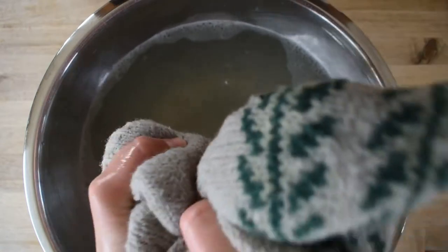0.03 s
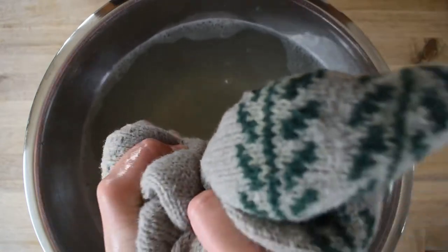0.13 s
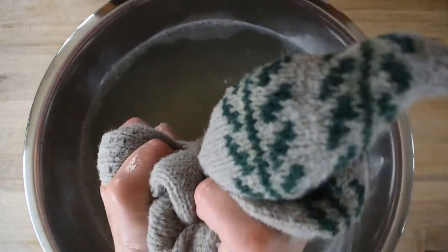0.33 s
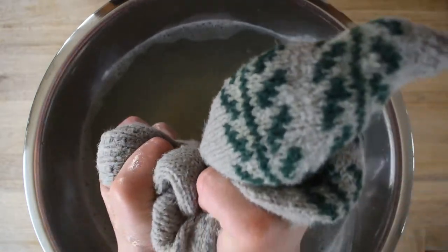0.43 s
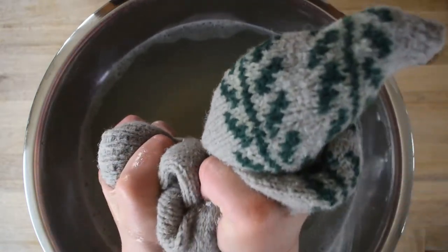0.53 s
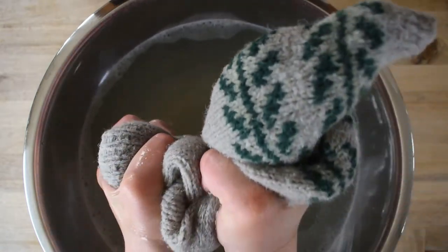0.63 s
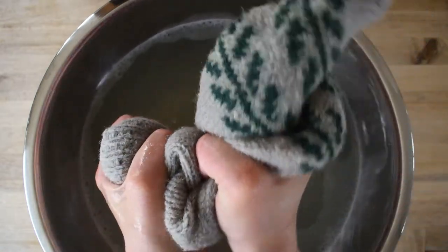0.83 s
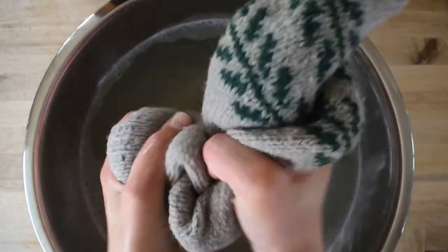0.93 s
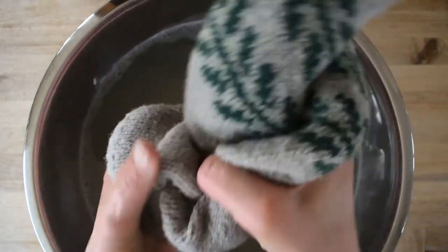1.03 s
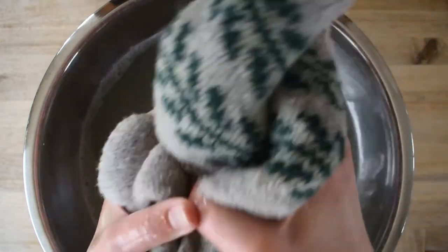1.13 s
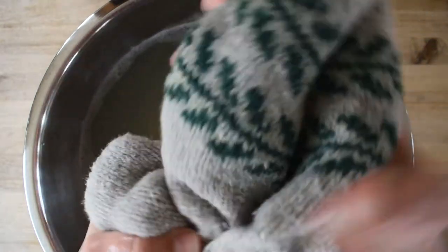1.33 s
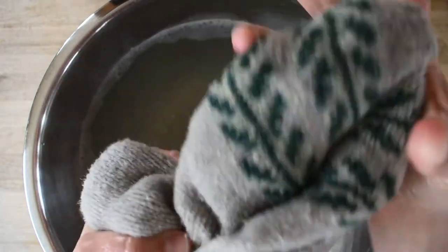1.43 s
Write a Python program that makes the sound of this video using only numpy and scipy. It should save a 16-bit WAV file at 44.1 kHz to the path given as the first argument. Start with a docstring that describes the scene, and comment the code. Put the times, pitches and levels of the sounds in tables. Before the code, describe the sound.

Water is wrung from wet wool into a metal basin, close by in a quiet room. Soft rubbing and fizzing lead to a short gurgle at about 0.2 seconds. From 0.3 to 1 second water trickles and drops plop, with tiny wet squeaks and faint ringing from the basin. A fine spray hisses near 0.85 seconds. After 1 second the water dies down, leaving faint clicks and soft knocks.

```python
"""Two hands wring a wet knitted garment over a metal basin of water, in a quiet room.
First the hands rub the cloth, foam fizzes softly and wet fibres tick. Near 0.2 s air gurgles out of
the wool and water trickles; then froth squeaks and drops plop, making the basin ring faintly.
Near 0.85 s, at the hardest squeeze, the fizz peaks and a fine spray hisses out. After 1 s the grip
relaxes and the water dies down, leaving a few last clicks and soft knocks."""
import sys
import numpy as np
from scipy import signal
from scipy.fft import rfft, irfft
from scipy.io import wavfile

SR = 44100
rng = np.random.default_rng(int(sys.argv[2]) if len(sys.argv) > 2 else 0)


def materialize(psi):
    """Save the field psi as 16-bit PCM at rate SR to the path in sys.argv[1].

    A 1-D psi becomes a single channel; in a 2-D psi each row is a channel.
    """
    bounded = np.clip(np.atleast_2d(psi).T, -1, 1)
    quanta = np.round(bounded * 32767).astype(np.int16)
    wavfile.write(sys.argv[1], SR, quanta)


N = 66150
TIME = np.arange(N) / SR


def amp(db):
    """Turn decibels into a number to multiply a sound by."""
    return 10 ** (np.asarray(db) / 20)


def unit(sound):
    """Scale a sound so that its average strength (rms) is 1."""
    return sound / np.sqrt(np.mean(sound ** 2) + 1e-20)


def level(points, t=TIME):
    """Join (time, dB) points with lines and give the gain at times t."""
    return amp(np.interp(t, *np.transpose(points)))


def colour(sound, points):
    """Set the balance of low and high tones from (Hz, dB) points; the result has strength 1."""
    hz, db = np.transpose(points)
    log_hz = np.log(np.fft.rfftfreq(N, 1 / SR) + 1)
    gain = amp(np.interp(log_hz, np.log(hz), db))
    return unit(irfft(rfft(sound) * gain, N))


def add(mix, start, sound):
    """Mix a sound in, start seconds from the beginning."""
    part = mix[max(round(start * SR), 0):][:len(sound)]
    part += sound[:len(part)]


def stereo(mid, side):
    """Make left and right from what they share (mid) and how they differ (side)."""
    return np.array([mid + side, mid - side])


def burst(envelope, hz, octaves, skirt_db):
    """Noise in a band around hz, plus a wider band (the skirt); the envelope sets its loudness."""
    octaves_away = np.log2((np.fft.rfftfreq(len(envelope), 1 / SR) + 1) / hz)
    band = np.exp(-.5 * (octaves_away / octaves) ** 2)
    skirt = amp(skirt_db) * np.exp(-.5 * octaves_away ** 2)
    noise = irfft((band + skirt) * np.exp(2j * np.pi * rng.random(len(band))))
    return unit(envelope * noise) * np.sqrt(np.mean(envelope ** 2))


def knocks(rows, octaves, skirt_db):
    """Each small hit is a burst of noise that rises quickly and dies away."""
    out, t = np.zeros(N), TIME[:4096]
    for start, db, hz, decay in rows:
        rise = 1 - np.exp(-t / (0.3 * decay))
        envelope = rise * np.exp(-t / decay)
        add(out, start, amp(db) * burst(envelope / envelope.max(), hz, octaves, skirt_db))
    return out


def bubble(hz, swell, ring, glide):
    """A bubble swells, rings and dies; its pitch slides as its size and depth change."""
    t = np.arange(0, 4 * ring + swell, 1 / SR)
    envelope = np.minimum(t / swell, 1) * np.exp(-(t / ring) ** 1.39)
    sliding_hz = hz * 2 ** (glide * t)
    return envelope / envelope.max() * np.sin(2 * np.pi * np.cumsum(sliding_hz) / SR)


# Tone of the room noise, mid and side: f/Hz, level/dB
ROOM_MID_COLOUR = [(15, -56), (25, -48.5), (113, -4.5), (178, -5.5), (389, -1.5), (509, -1), (582, -12.5),
                   (895, -2), (1050, -5), (1750, -4.5), (2490, -13.5), (9050, -38.5), (15500, -44)]
ROOM_SIDE_COLOUR = [(15, -44), (25, -13), (178, -4.5), (340, -4), (1050, -5), (1140, -3), (1380, -6),
                    (2560, -6), (9300, -23), (15500, -42)]

def room_noise():
    """The quiet room gives a steady hush and a faint hum of mains electricity."""
    mid = amp(-63) * colour(rng.standard_normal(N), ROOM_MID_COLOUR)
    side = amp(-63.5) * colour(rng.standard_normal(N), ROOM_SIDE_COLOUR)
    hum = amp(-80) * np.sqrt(2) * np.sin(2 * np.pi * 120.1 * TIME)
    return stereo(mid + hum, side)


# Loudness of the dull rubbing: t/s, level/dB
RUB_LOUDNESS = [(0, -65), (.2, -61.5), (.45, -62), (.75, -60.5), (.95, -60.5), (1.1, -63.5), (1.29, -65.5),
                (1.312, -60.5), (1.335, -63), (1.4, -64.5), (1.5, -59)]
# Its tone: f/Hz, level/dB
RUB_TONE = [(30, -18), (80, -13.5), (140, -4.5), (400, 0), (700, -1.5), (1500, -27.5), (6000, -42)]
# Soft knocks of hands and cloth: t/s, level/dB, f/Hz, decay/s
HAND_KNOCKS = [(.461, -59.5, 191, .012), (.665, -61, 171, 0.01), (1.306, -60, 250, 0.0077),
               (1.412, -60.5, 256, 0.022), (1.484, -61, 201, 0.01)]

def hands(width=0.36):
    """Hands rub and knock against the heavy wet cloth."""
    mid, side = (level(RUB_LOUDNESS) * colour(rng.standard_normal(N), RUB_TONE) for _ in range(2))
    return stereo(mid + knocks(HAND_KNOCKS, octaves=0.91, skirt_db=-30), width * side)


# Loudness of the foam in the wool: t/s, level/dB
FOAM_LOUDNESS = [(0, -70.5), (.1, -65.5), (.2, -60), (.33, -55.5), (.4, -58), (.46, -59), (.52, -62.5),
                 (.6, -54.5), (.66, -61), (.75, -63), (.8, -55), (.85, -50.5), (.9, -55), (.96, -56.5),
                 (1.02, -61.5), (1.15, -68), (1.27, -64), (1.5, -66)]
# Its tone: f/Hz, level/dB
FOAM_TONE = [(300, -42), (900, 2.5), (2500, 4.5), (4000, 5.5), (6000, -1), (8500, -4.5), (12000, -11.5),
             (16000, -18)]

def fizz(pops_per_s=2500, scatter_db=4):
    """Foam bursts in countless tiny clicks as the grip tightens."""
    pops = (rng.random(N) < pops_per_s / SR) * rng.choice([-1, 1], N)
    sizes = amp(scatter_db * np.minimum(rng.exponential(1, N), 5))
    hiss = 1.25 * rng.standard_normal(N)
    return colour(unit(pops * sizes) + hiss, FOAM_TONE) * level(FOAM_LOUDNESS)


# Loudness of the ticking fibres: t/s, level/dB
FIBRE_LOUDNESS = [(0, -70), (.1, -75), (.3, -65), (.43, -60.5), (.52, -64), (.65, -60.5), (.8, -58),
                  (.95, -63.5), (1.1, -71.5), (1.25, -67.5), (1.5, -79.5)]
# Their tone: f/Hz, level/dB
FIBRE_TONE = [(500, -23), (2000, 7), (5000, -4.5), (9000, -2), (12000, -9), (16000, -14)]

def crackle(ticks_per_s=170, scatter_db=3, decay_s=0.00056):
    """Wet fibres pull apart with separate tiny ticks."""
    ticks = rng.random(N) < ticks_per_s / SR
    sizes = amp(scatter_db * np.clip(rng.standard_normal(N), -2, 2))
    envelope = signal.lfilter([1], [1, -np.exp(-1 / (decay_s * SR))], ticks * sizes)  # each tick fades
    return colour(envelope * rng.standard_normal(N), FIBRE_TONE) * level(FIBRE_LOUDNESS)


# Wet slaps and clicks, before their tone is shaped: t/s, level/dB, f/Hz, decay/s
WET_SLAPS = [(0.071, -53, 8000, 0.0012), (.091, -49, 2600, 0.0019), (.1105, -53.5, 8000, 0.0014),
             (.2545, -58, 8000, 0.0024), (.270, -43, 2200, 0.0061), (.2863, -40.5, 3500, 0.00069),
             (0.307, -68, 7000, .003), (0.3546, -45.5, 9800, .003), (.414, -39.5, 7000, 0.00066),
             (0.43, -39.5, 6200, 0.0018), (0.4328, -43, 3750, 0.0017), (.4545, -41, 5640, 0.00041),
             (0.4573, -34.5, 3700, 0.001), (.4818, -43.5, 4530, .001), (.529, -43, 7100, .001),
             (0.5554, -36, 3770, 0.00057), (.560, -37.5, 4730, 0.0014), (.6150, -31.5, 7000, 0.00058),
             (.620, -38, 4030, 0.00044), (0.629, -38.5, 2600, 0.0013), (0.6359, -32, 3080, 0.0007),
             (0.6617, -39, 3700, 0.003), (0.7292, -35, 2260, 0.00056), (0.7384, -41, 2010, 0.0019),
             (.745, -38.5, 2200, 0.00066), (.771, -38, 2750, 0.0015), (.7953, -38.5, 9800, .001),
             (0.8005, -38.5, 4470, 0.0013), (0.807, -41, 5500, 0.0015), (.840, -47, 3980, 0.0016),
             (0.8985, -41, 3200, 0.00082), (.926, -34, 3780, 0.001), (.977, -46, 2520, 0.00061),
             (1.2592, -44, 6940, 0.0014), (1.286, -53, 7600, 0.0011)]
# Their tone: f/Hz, level/dB
SLAP_TONE = [(500, 11.5), (4000, 1.5), (9000, -1.5), (12000, -7.5), (16000, -9)]

def splats():
    """Drops land and thin films of water snap, each with a short burst of noise."""
    slaps = knocks(WET_SLAPS, octaves=0.3, skirt_db=2)
    return colour(slaps, SLAP_TONE) * np.std(slaps)


# Loudness of the air puffs: t/s, level/dB
PUFF_LOUDNESS = [(0, -68), (.14, -62), (.18, -45.5), (.205, -44), (.232, -34.5), (.255, -48), (.3, -46),
                 (.35, -49.5), (.385, -77)]
# Air pockets in the wool: f/Hz, level/dB, ring/s
AIR_POCKETS = [(1610, 1.5, 0.0027), (2734, -1, 0.0029), (2140, -7, 0.0021), (4100, -9.5, 0.0013),
               (1060, -12.5, 0.0015), (620, -12, 0.0065)]

def gurgle(puffs_per_s=190, unevenness=0.2, scatter_db=2.5, pitch_spread=0.049):
    """Air escapes in quick uneven puffs, each ringing the pockets in the wet knit."""
    out, start = np.zeros(N), 0
    while start < PUFF_LOUDNESS[-1][0]:
        start += np.exp(unevenness * rng.standard_normal()) / puffs_per_s
        for hz, db, ring in AIR_POCKETS:
            size, detune = rng.standard_normal(2)
            gain = level(PUFF_LOUDNESS, start) * amp(db + scatter_db * size)
            add(out, start, gain * bubble(hz * np.exp(pitch_spread * detune), ring / 2, ring, glide=0))
    return out


# Loudness of the trickling water: t/s, level/dB
TRICKLE_LOUDNESS = [(0, -84), (.2, -50.5), (.3, -63), (.39, -74), (.44, -47.5), (.52, -60.5), (.58, -57),
                    (.68, -46.5), (.72, -67), (.78, -58.5), (.86, -45), (.94, -55), (1.0, -58.5),
                    (1.1, -81), (1.5, -80)]

def trickle(bubbles_per_s=800, middle_hz=2294, spread_octaves=0.823, scatter_db=4, ring_cycles=5.7):
    """Thin streams of water make many tiny bubbles of random size."""
    out = np.zeros(N)
    for start in np.arange(0, N / SR, 1 / bubbles_per_s):
        late, pitch, size, glide = np.clip(rng.standard_normal(4), -2, 2)
        hz = np.clip(middle_hz * 2 ** (spread_octaves * pitch), 850, 12000)
        ring = ring_cycles / hz
        gain = amp(scatter_db * size) * (hz / middle_hz) ** 0.1  # high ones are a little stronger
        add(out, start + late / bubbles_per_s, gain * bubble(hz, ring / 3, ring, 25 * glide))
    return unit(out) * level(TRICKLE_LOUDNESS)


# Squirts of froth through the knit: t/s, level/dB, f/Hz, length/s
FROTH_SQUIRTS = [(0.254, -55, 8600, .006), (0.267, -49, 6900, 0.0074), (0.276, -42, 7320, 0.0083),
                 (0.3053, -45.5, 5050, 0.01), (.306, -41.5, 6700, 0.0099), (0.304, -53, 8340, 0.01),
                 (.326, -56, 6800, 0.014), (.352, -54, 10150, 0.01), (.355, -48, 7550, .009),
                 (0.4522, -46, 8150, 0.0077), (0.653, -55.5, 8600, 0.013), (0.768, -42, 6100, 0.0057),
                 (.775, -45, 4930, 0.0068), (.776, -52, 7000, 0.0068)]

def squirts():
    """Froth forced through narrow gaps gives short, rough, high squeaks."""
    out, t = np.zeros(N), TIME[:2048]
    for start, db, hz, length in FROTH_SQUIRTS:
        envelope = np.sin(np.pi * np.minimum(t / length, 1))
        add(out, start, amp(db) * burst(envelope, hz, octaves=0.072, skirt_db=-30))
    return out


# Single ringing bubbles: t/s, f/Hz, level/dB, swell/s, ring/s, glide/(octaves per s)
PLOP_BUBBLES = [(0.267, 1577, -34.5, 0.0013, 0.0047, -4), (0.2861, 3430, -33.5, .0003, .0013, -200),
                (0.286, 2146, -30, 0.0049, 0.0048, 4.5), (0.3053, 1720, -32.5, 0.0045, 0.0039, -6),
                (0.413, 2726, -36, 0.0008, 0.011, 1.5), (.4155, 3150, -31.5, 0.0014, 0.0026, -3),
                (.4345, 2390, -30, 0.00077, 0.0038, -30), (.4569, 1352, -21, 0.00079, 0.0023, 2),
                (0.4596, 1254, -32, 0.00036, .006, -3), (.457, 4230, -37, .001, 0.0024, 0),
                (0.4815, 1420, -30.5, 0.00037, 0.003, -20), (.483, 2140, -35.5, .003, 0.0083, -1),
                (.538, 2090, -37, 0.00094, 0.0049, -17), (.552, 1680, -29.5, 0.0013, 0.0044, -27),
                (0.557, 1240, -30.5, 0.00035, 0.003, 0), (0.5597, 2343, -22.5, 0.00076, 0.0042, -11),
                (.5745, 1770, -35.5, 0.00057, 0.0033, 0), (.586, 1000, -44.5, 0.0033, 0.0093, 4),
                (0.592, 4410, -34.5, 0.00033, .002, 72), (.6028, 2605, -26.5, 0.0016, 0.0025, 39),
                (0.607, 3550, -37.5, 0.0012, 0.0033, 30), (0.6202, 2766, -23.5, 0.0011, 0.0023, 1),
                (0.6304, 1023, -31.5, 0.00078, 0.0099, 10.5), (0.6357, 2206, -33, 0.00045, 0.0078, -10),
                (0.6623, 1687, -26, 0.005, 0.0052, -5), (0.6712, 1003, -36.5, .001, 0.013, 0.5),
                (.673, 1620, -31, 0.00076, 0.0049, 6), (0.691, 1612, -34.5, 0.0028, 0.0062, 2),
                (0.699, 955, -36.5, 0.0012, 0.0075, 4), (.7005, 2320, -37.5, 0.00058, 0.0033, 7),
                (.704, 2800, -42.5, 0.00067, 0.0061, 62), (.728, 1395, -20.5, 0.00066, 0.0015, -35),
                (.7305, 1255, -31, 0.00077, 0.0058, -1), (0.739, 847.5, -21, 0.00058, 0.012, 1),
                (0.7397, 1257, -29.5, 0.00071, 0.0043, 0), (.745, 2120, -39, .001, 0.003, -2),
                (0.7628, 2180, -36.5, 0.0012, 0.01, 0.5), (.776, 2670, -33.5, .0005, 0.0028, -20),
                (0.7816, 1590, -29.5, 0.0018, 0.0045, 9), (.802, 830, -46, 0.0012, 0.0064, 0),
                (0.8012, 2900, -38.5, .001, .002, -2), (0.8159, 2756, -37, .002, 0.0018, -48),
                (.840, 2300, -29, 0.00088, 0.0012, 80), (0.8977, 1613, -25.5, 0.0026, 0.0075, 6.5),
                (.898, 922, -40.5, .001, 0.011, 4), (.9262, 2196, -33.5, 0.00024, 0.0045, -4),
                (0.924, 4310, -38, 0.00037, 0.0031, -13), (0.9267, 1100, -38, .001, 0.0079, 0.5),
                (0.954, 985, -40.5, 0.0011, 0.005, -11), (0.9767, 1298, -27.5, 0.00054, 0.0064, -13),
                (.977, 1550, -37.5, 0.0012, .005, 0), (0.978, 823, -32, 0.00035, 0.016, 7.5),
                (.996, 1214, -44, 0.0024, 0.0078, 2.5), (1.0409, 1295, -39, 0.00035, 0.0055, 13.5),
                (1.053, 1376, -42.5, 0.00075, 0.0051, 5.5), (1.069, 7900, -41, 0.00057, 0.00053, -48)]

def plops():
    """Large bubbles ring, from drops hitting the water and from the wool."""
    out = np.zeros(N)
    for start, hz, db, swell, ring, glide in PLOP_BUBBLES:
        add(out, start, amp(db) * bubble(hz, swell, ring, glide))
    return out


# Tone of the airy spray: f/Hz, level/dB
SPRAY_TONE = [(800, -21), (2500, -3), (4000, -2), (8000, 0), (12000, -4.5), (16000, -11)]

def spray(peak_s=0.871, fade_s=0.055, peak_db=-54):
    """Air and fine mist hiss out at the hardest squeeze."""
    envelope = np.exp(-((TIME - peak_s) / fade_s) ** 2)
    return amp(peak_db) * envelope * colour(rng.standard_normal(N), SPRAY_TONE)


# Notes the basin rings at: f/Hz, relative level/dB, time to fade by 60 dB/s
BASIN_NOTES = [(882, -25, .9), (1090, -52, .4), (1242, -21, 0.17), (1375, -35, 0.28), (1612, -15, 0.16),
               (1735, -21, .35), (1950, -17, .35), (1870, -45, .3), (2210, -34, 0.27), (2250, -23, 0.41),
               (2753, -13.5, 0.15), (2800, -30, 0.31), (2960, -45, 0.21)]
# Echoes from the basin wall and the table: delay/s, level/dB
NEAR_ECHOES = [(.0027, -21.5), (.0075, -21.5), (0.0132, -21.5), (.0205, -39)]

def basin(sound):
    """The metal bowl bounces each sound back and rings on faintly."""
    t, out = TIME[:N // 2], sound.copy()
    ring = sum(amp(db - 60 * t / fade) * np.cos(2 * np.pi * hz * t) for hz, db, fade in BASIN_NOTES)
    for delay, db in NEAR_ECHOES:
        add(out, delay, amp(db) * sound)
    return out + signal.fftconvolve(sound, ring * 300 / SR)[:N]


def room_echo(sound, build_s=0.0033, fade_s=0.49, dull_above_hz=6100):
    """Many echoes from the room blur into a short, slightly dull tail."""
    t = TIME[:N // 2]
    tail = rng.standard_normal(len(t)) * np.minimum(t / build_s, 1) * amp(-60 * t / fade_s)
    tail = signal.lfilter(*signal.butter(1, dull_above_hz, fs=SR), tail / np.linalg.norm(tail))
    return amp(-11.5) * signal.fftconvolve(sound, tail)[:N]


def scene():
    """The water sounds ring in the basin and echo in the room; hands and room noise join them."""
    water = plops() + gurgle() + trickle() + splats() + squirts() + fizz() + spray() + crackle()
    bass_cut = signal.butter(3, 670, "high", fs=SR, output="sos")  # too small to give off bass
    in_basin = basin(signal.sosfilt(bass_cut, water))
    # Fresh noise on each call makes left and right differ, so the sound feels wide.
    side = 0.19 * (splats() + squirts() + fizz() + spray()) + 0.1 * room_echo(in_basin)
    return stereo(in_basin + room_echo(in_basin), side) + hands() + room_noise()


def record(dry):
    """Cut away the very highest treble, above 15800 Hz."""
    treble_cut = signal.firwin(511, 15800, window=("kaiser", 9), fs=SR)
    return signal.oaconvolve(dry, treble_cut[None], "same")


dry = scene()
out = record(dry)
materialize(out)
```